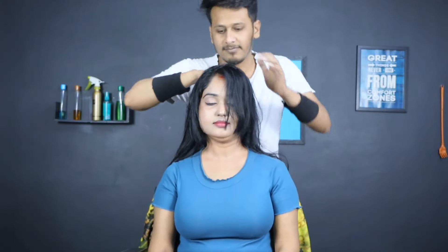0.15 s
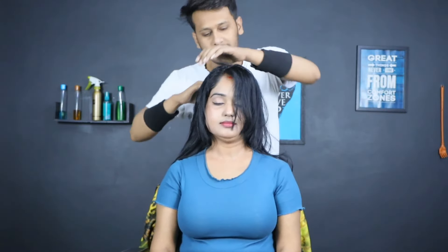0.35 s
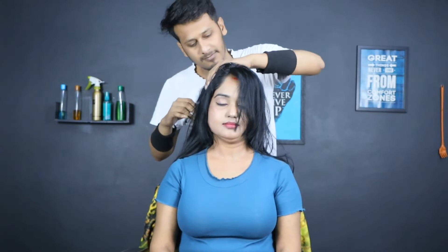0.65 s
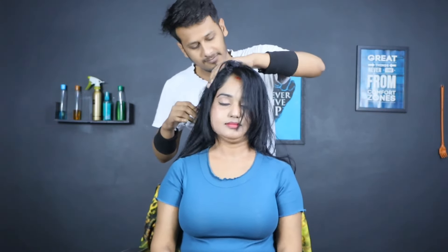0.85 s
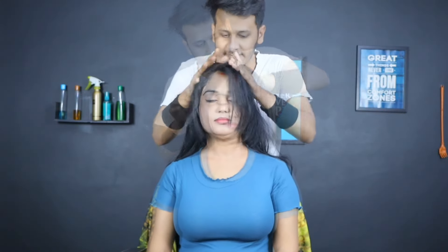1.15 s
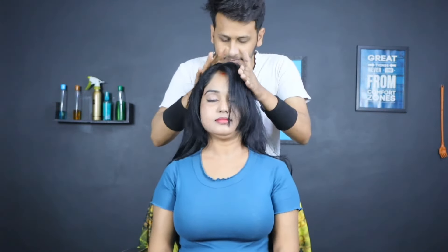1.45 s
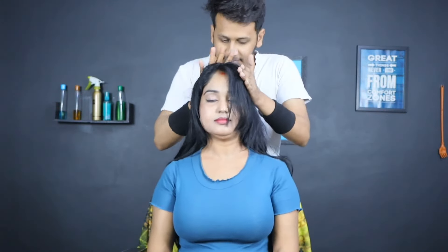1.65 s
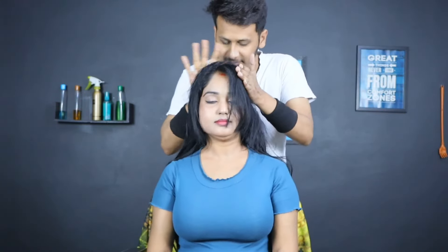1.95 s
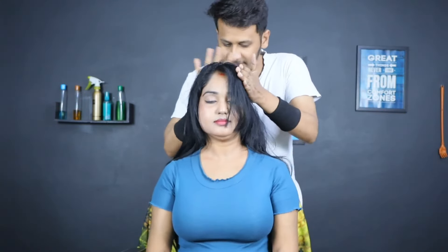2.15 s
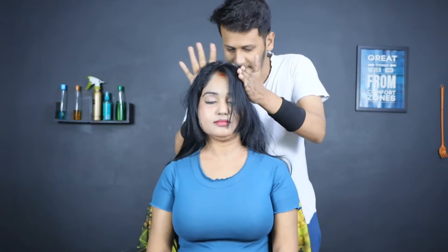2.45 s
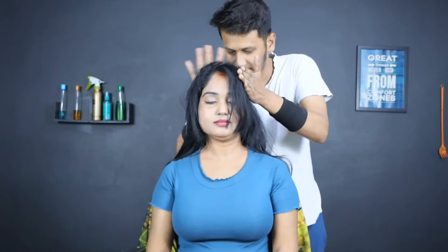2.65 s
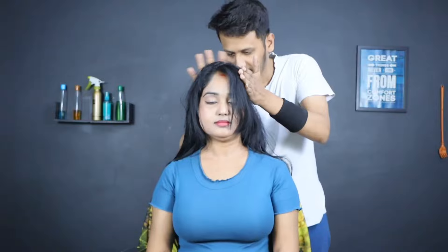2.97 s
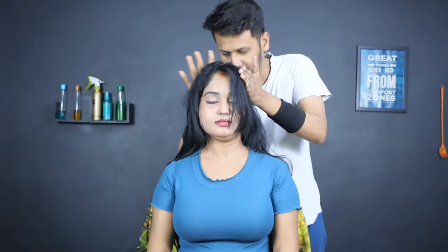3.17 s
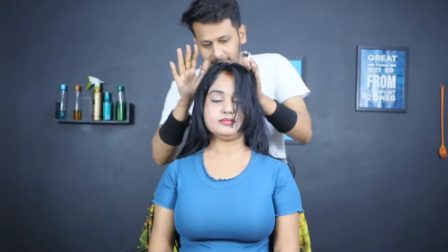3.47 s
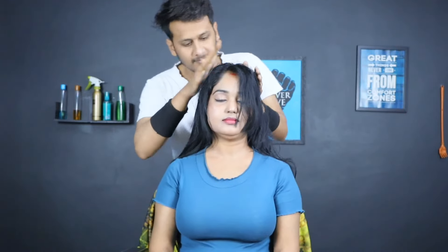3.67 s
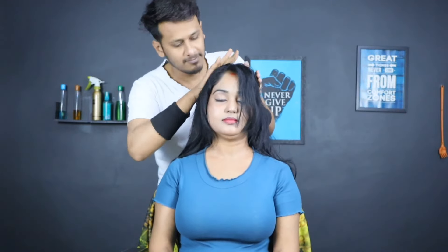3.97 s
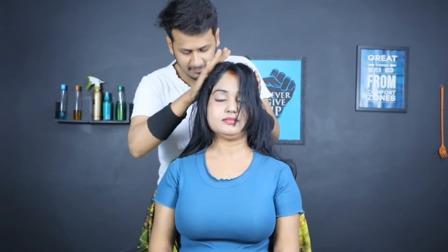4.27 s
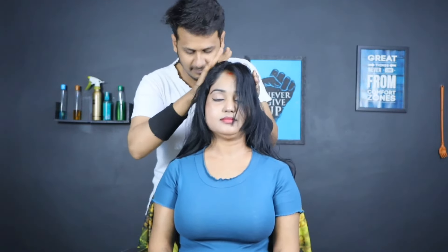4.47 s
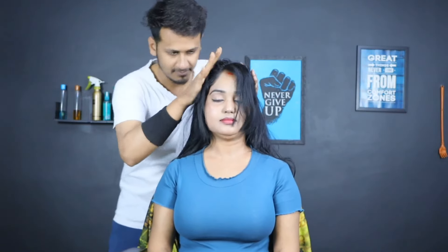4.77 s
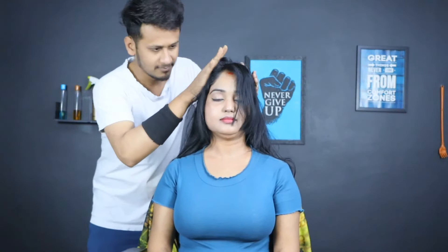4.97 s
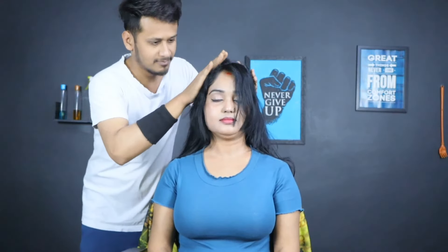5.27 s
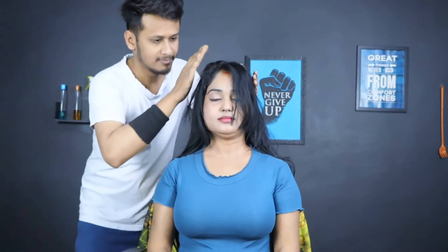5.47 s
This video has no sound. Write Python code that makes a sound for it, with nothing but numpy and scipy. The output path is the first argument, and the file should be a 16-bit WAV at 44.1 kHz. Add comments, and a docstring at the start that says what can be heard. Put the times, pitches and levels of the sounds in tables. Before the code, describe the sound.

Fast, hissing strokes of hands on hair and scalp move between the ears, with two sharp ticks and a few soft microphone bumps.

```python
"""Two hands rub through long hair, each close to one microphone of a binaural pair, in a faintly humming room.
Sliding strands hiss and snap as the hands skim right, then left, then knead; the scalp rumbles softly under
the pressure and sharp ticks sound near 0.8 and 1.5 s. The rubbing settles on the left, about nine strokes a
second, and around 2 s a hand bumps a microphone. After a pause with a dull shuffle at 3.7 s, the strokes
resume a little to the right and gradually lose their sparkle."""
import sys
import numpy as np
from scipy import signal
from scipy.fft import rfft, irfft
from scipy.io import wavfile

SR = 44100
rng = np.random.default_rng(int(sys.argv[2]) if len(sys.argv) > 2 else 0)


def inscribe(sig):
    """Save sig as 16-bit PCM at rate SR to the path in sys.argv[1].

    A 1-D sig is mono; a 2-D sig holds one channel per row.
    Samples are clipped to [-1, 1] before scaling.
    """
    pcm = np.round(np.clip(np.atleast_2d(sig).T, -1, 1) * 32767)
    wavfile.write(sys.argv[1], SR, pcm.astype(np.int16))


N = 247842
TIME = np.arange(N) / SR

# hand strokes, mostly a push and a return in turn: (time of full speed [s], length [s],
# level at the nearer ear [dB], left minus right [dB], extra brightness [dB/octave], move)
HAND_STROKES = [(.05, .073, -45.3, -19, .7, "right skim"), (.131, .041, -45.3, -29, 3.2, "right skim"),
                (.17, .112, -49.7, -11, -1.5, "right skim"), (.688, .058, -40.5, 29, 0, "left skim"),
                (.808, .077, -42.1, 13, -1.3, "left skim"), (.9, .07, -45.1, 16, .6, "left skim"),
                (1.012, .066, -46.5, 18, 3.4, "left skim"), (1.099, .055, -50.6, 12, 3.6, "left skim"),
                (1.134, .099, -47, 1, .5, "knead"), (1.254, .088, -40.4, 1, .3, "knead"),
                (1.339, .056, -34.4, -7, .2, "knead"), (1.38, .095, -39.7, 6, -1.1, "knead"),
                (1.481, .08, -33.7, -1, -.2, "knead"), (1.559, .049, -27.6, -9, -.7, "knead"),
                (1.584, .085, -34, 3, .2, "knead"), (1.679, .072, -39.8, -3, .6, "knead"),
                (1.784, .065, -29.2, 2, .8, "left push"), (1.902, .068, -41.6, 5, 1.4, "left return"),
                (1.997, .051, -27, 10, 0, "left push"), (2.115, .075, -37.5, 12, .6, "left return"),
                (2.227, .06, -32.1, 12, -.8, "left push"), (2.347, .071, -38.8, 11, .8, "left return"),
                (2.45, .047, -28.8, 9, .2, "left push"), (2.567, .089, -42.4, 9, 0, "left return"),
                (2.688, .063, -31.2, 11, .6, "left push"), (2.81, .078, -38.8, 9, -1, "left return"),
                (2.919, .052, -30, 9, .4, "left push"), (3.043, .066, -37, 7, -.3, "left return"),
                (3.15, .058, -30.7, 8, -.2, "left push"), (3.274, .071, -34.1, 7, .4, "left return"),
                (3.383, .064, -28.2, 7, .5, "left push"), (3.425, .044, -31.3, 16, -2.4, "left return"),
                (3.481, .059, -53.1, 18, -5.1, "left skim"), (3.901, .116, -59.8, -2, 0, "right push"),
                (4.013, .047, -39, -11, 1.7, "right return"), (4.093, .069, -33.4, -3, -.9, "right push"),
                (4.225, .067, -34.8, -4, -.4, "right return"), (4.32, .066, -33.1, -5, 0, "right push"),
                (4.447, .062, -35.6, -7, -1.5, "right return"), (4.549, .069, -33.5, -5, -.4, "right push"),
                (4.681, .064, -36.5, -7, -1.1, "right return"), (4.772, .071, -35.1, -4, 0, "right push"),
                (4.907, .064, -36.5, -3, 0, "right return"), (5, .068, -36.5, -2, .5, "right push"),
                (5.094, .073, -49.5, 2, 0, "right push"), (5.144, .052, -43.8, -19, .8, "right return"),
                (5.21, .046, -50.6, -11, -2.5, "right skim"), (5.246, .058, -38.5, 1, .6, "right push"),
                (5.358, .071, -38.6, -2, 0, "right return"), (5.457, .075, -41.8, -2, .5, "right push")]
# the gesture of each move: (share of the length spent speeding up, left ear's lag [s],
# left tilt [dB/octave], right tilt [dB/octave], brightening along the stroke [dB/octave],
# palm's muffling of both spectral ends [dB/octave^2], growth of the palm's ring [dB])
HAND_MOVES = {"right skim": (.48, -.004, 6.4, 4.6, -2.8, -1, 0),
              "left skim": (.37, -.002, 5.9, -4.1, -3.2, -.1, 0),
              "knead": (.39, -.001, 3.2, 1.3, -2, 1.2, 0),
              "left push": (.37, .005, 2.4, -2.3, -2.8, 1.5, 1),
              "left return": (.47, -.007, 2.9, -1.9, 1.4, 1.2, -1.5),
              "right push": (.4, .01, 1.4, -1.9, -1.6, 1.4, 2.5),
              "right return": (.47, -.008, 5.1, .7, 3.8, .9, -3)}


def gain_of(db):
    """Decibels to amplitude."""
    return 10 ** (np.asarray(db) / 20)


def unit_rms(x):
    """Scales to rms 1."""
    return x / np.sqrt(np.mean(x ** 2) + 1e-20)


def curve_at(points, hz):
    """Reads a curve on a log-frequency axis."""
    f, value = np.transpose(points)
    return np.interp(np.log(hz + 1), np.log(f + 1), value)


def coloured(x, eq):
    """Applies an EQ curve of (frequency [Hz], gain [dB])."""
    return irfft(rfft(x) * gain_of(curve_at(eq, np.fft.rfftfreq(N, 1 / SR))), N)


def wide_noise(eq):
    """Coloured stereo noise at rms 1, centred in the bass and wide in the treble."""
    # likeness of the two ears: (frequency [Hz], correlation)
    likeness = [(60, 1), (130, .97), (290, 0.68), (520, 0.47), (700, -0.0039), (1400, -.05), (3000, 0.072),
                (15000, -0.049)]
    left, unrelated = rfft(rng.standard_normal((2, N)))
    same = np.clip(curve_at(likeness, np.fft.rfftfreq(N, 1 / SR)), -1, 1)
    right = same * left + np.sqrt(1 - same ** 2) * unrelated
    return unit_rms(coloured(irfft(np.array([left, right]), N), eq))


def patches(shape, span_s, span_hz, step_s, step_hz):
    """A smooth random field over frequency and time for each ear, rms 1."""
    along_f = np.fft.fftfreq(shape[1], step_hz)[:, None] * span_hz
    along_t = np.fft.rfftfreq(shape[2], step_s) * span_s
    field = np.fft.rfft2(rng.standard_normal(shape)) * np.exp(-2 * (along_f ** 2 + along_t ** 2))
    return unit_rms(np.fft.irfft2(field, shape[1:]))


def room_tone(level_db=-66.2):
    """The room's steady bed of soft, dark noise."""
    # colour of the bed: (frequency [Hz], gain [dB])
    air_eq = [(30, -15), (52, -12), (88, -28), (160, -10), (230, -13.5), (345, -13.5), (400, -17),
              (480, -22), (625, -17.5), (1000, -26.5), (1400, -21.5), (1950, -31), (4000, -29.5),
              (15500, -38.5)]
    return gain_of(level_db) * wide_noise(air_eq)


def room_hum(width_hz=5.3, change_s=2.4):
    """Narrow bands of noise make faint wavering tones whose balance shifts part way through."""
    # tones of the hum: (frequency [Hz], early level [dB], late level [dB])
    tones = [(118, -78, -75.5), (161.3, -69.5, -70.5), (239.1, -79, -65), (287.1, -81.5, -66),
             (342.4, -75, -71), (403, -79, -74)]
    hz, out = np.fft.rfftfreq(N, 1 / SR), np.zeros(N)
    crossfade = .5 + .5 * np.tanh(2 * (TIME - change_s))
    for centre, early_db, late_db in tones:
        tone = irfft(rfft(rng.standard_normal(N)) / (1 + ((hz - centre) / width_hz) ** 2), N)
        out += unit_rms(tone) * gain_of(early_db + crossfade * (late_db - early_db))
    return out


def strands(snaps_per_s=320, snap_db=7, spread_db=2.6):
    """Countless tiny slips merge into hiss; single hairs snap free above it."""
    size = gain_of(snap_db + spread_db * np.minimum(rng.exponential(1, (2, N)), 4))
    snaps = size * rng.choice([-1, 1], (2, N)) * (rng.random((2, N)) < snaps_per_s / SR)
    return unit_rms(rng.standard_normal((2, N)) + snaps)


def stroke_power(hz, t, pivot_hz=4000, rise_steepness=1.8, fall_steepness=1.95):
    """Each stroke swells and fades with the hand's speed and changes colour as the fingers travel."""
    palm_hz, palm_width_hz = 2300, 1100  # the palm's hollow closes on a push and opens on the return
    dull_from_s, dull_rates = 4.4, (5.3, 2)  # the last strokes darken: (left, right) [dB/octave per s]
    octave = np.log2(np.maximum(hz, 600) / pivot_hz)[:, None]
    ends = np.minimum(octave ** 2, 3.05 + 2 * (octave < 0))  # capped: fizz escapes even a firm palm
    palm = np.exp(-(2 * (hz[:, None] - palm_hz) / palm_width_hz) ** 2)
    power = np.zeros((2, len(hz), len(t)))
    for s, length, db, pan_db, bright, move in HAND_STROKES:
        run_up, lag_s, left_tilt, right_tilt, sweep, muffle, ring_db = HAND_MOVES[move]
        near = abs(t - s) < .25
        ears = [(s + lag_s, min(pan_db, 0), left_tilt), (s, min(-pan_db, 0), right_tilt)]
        for ear, (peak_s, far_db, tilt) in enumerate(ears):
            rising = t[near] < peak_s
            ramp_s = np.maximum(length * np.where(rising, run_up, 1 - run_up), .004)
            travel = (t[near] - peak_s) / ramp_s
            speed = np.exp(-abs(travel) ** np.where(rising, rise_steepness, fall_steepness))
            dulling = dull_rates[ear] * max(s - dull_from_s, 0)
            slope = tilt + bright + sweep * np.tanh(travel / 2) - dulling
            colour_db = slope * octave - muffle * ends + ring_db * palm * np.tanh(travel)
            power[ear][:, near] += (speed * gain_of(db + far_db + colour_db)) ** 2
    return power


def cupped_hands(hz, t, crossfade_s=0.11):
    """The hollow between palm and head acts as an EQ, in dB at each ear, that shifts with the hold."""
    # span of each hold: (start [s], end [s])
    holds = {"right skim": (0, .5), "left skim": (.75, 1.15), "knead": (1.15, 1.9), "left rub": (1.9, 3.6),
             "right rub": (3.6, 5.7)}
    # resonances and dips of each hold: (frequency [Hz], width [Hz], left gain [dB], right gain [dB])
    resonances = {"right skim": [(2100, 500, 0, 4), (3500, 1000, -2, -4)],
                  "left skim": [(1650, 900, 8, .5)], "knead": [(750, 400, -9, -1), (1204, 330, 8, 8.5),
                  (2000, 500, 3, 0), (2690, 400, 4, 4), (3610, 400, -2, 5)],
                  "left rub": [(1050, 400, 2.5, 0), (1550, 650, -2, -3), (2250, 500, 3.5, 6.5),
                  (2820, 400, -2.5, 5), (3250, 450, 3, 0), (5400, 1200, 1, 2), (7900, 1600, -.5, -5)],
                  "right rub": [(1300, 600, 1, 1.5), (2120, 700, 3.5, 0), (4600, 2000, -1, -1),
                  (7000, 2000, 2, -.3)]}
    db = np.zeros((2, len(hz), len(t)))
    for hold, (start, end) in holds.items():
        held = (np.tanh((t - start) / crossfade_s) - np.tanh((t - end) / crossfade_s)) / 2
        for centre, width, left_db, right_db in resonances[hold]:
            bell = np.exp(-(2 * (hz - centre) / width) ** 2)
            db += np.multiply.outer([left_db, right_db], np.outer(bell, held))
    return db


def rubbing(hair_db=3.5, hollow_db=2.6, catch_db=1.52):
    """The hiss of the strands, driven by the strokes and coloured by the hands."""
    # colour of sliding hair at each ear: (frequency [Hz], gain [dB])
    left_eq = [(150, -29.5), (450, -12.5), (735, -14.5), (1060, -4), (1460, 1), (2500, 3), (4400, 3.5),
               (5700, 3), (7400, 0.4), (9700, -1.5), (12600, -6), (15500, -13)]
    right_eq = [(150, -26), (450, -14.5), (735, -9.5), (1060, -4.5), (1460, 1), (2300, 5.5), (3300, 3.5),
                (5700, 3), (7400, .5), (9700, -0.4), (12600, -4), (15500, -12.5)]
    # what passes round the head to the far ear: (frequency [Hz], gain [dB])
    head_shadow = [(300, -6), (700, -12.5), (1400, -18.5), (3000, -30), (7000, -49), (14000, -41)]
    hz, t, spectrum = signal.stft(strands(), SR, nperseg=512, noverlap=384)
    hair = np.array([curve_at(left_eq, hz), curve_at(right_eq, hz)])[:, :, None]
    # gaps between the fingers make narrow passing resonances; locks of hair catch and let go
    hollows = hollow_db * patches(spectrum.shape, span_s=0.061, span_hz=244, step_s=t[1], step_hz=hz[1])
    catches = catch_db * patches(spectrum.shape, span_s=0.025, span_hz=5950, step_s=t[1], step_hz=hz[1])
    colour = gain_of(hair_db + hair + cupped_hands(hz, t) + hollows + catches)
    stroked = spectrum * np.sqrt(stroke_power(hz, t)) * colour
    hiss = signal.istft(stroked, SR, nperseg=512, noverlap=384)[1][:, :N]
    near_ear = stick_slip() * turnarounds() * hiss
    return near_ear + coloured(near_ear[::-1], head_shadow)


def room_reverb(x, wet_db=-18.5, build_s=0.0067):
    """A short diffuse tail, different at each ear, whose treble dies first."""
    # decay of the room: (frequency [Hz], time to fall 60 dB [s])
    t60 = [(200, 0.5), (1500, .36), (5000, 0.31), (15000, 0.19)]
    # colour of the reverb: (frequency [Hz], gain [dB])
    reverb_eq = [(200, 18.5), (4000, -3.5), (15000, -8)]
    hz, t, noise = signal.stft(rng.standard_normal((2, SR // 2)), SR, nperseg=256)
    envelope = gain_of(-60 * t / curve_at(t60, hz)[:, None]) * (1 - np.exp(-t / build_s))
    tail = signal.istft(noise * envelope, SR, nperseg=256)[1]
    send = x.sum(0)[None] / np.sqrt(2)
    wet = signal.fftconvolve(send, tail / np.linalg.norm(tail[0]), axes=1)[:, :N]
    return gain_of(wet_db) * coloured(wet, reverb_eq)


def turnarounds(dip_db=-2.2, half_s=.007, apart=1.3):
    """The hiss dips where the hand stops to turn round between two separate strokes."""
    db = np.zeros(N)
    for stroke, following in zip(HAND_STROKES, HAND_STROKES[1:]):
        s, length, *_, move = stroke
        next_s, next_length, *_, next_move = following
        fall, rise = length * (1 - HAND_MOVES[move][0]), next_length * HAND_MOVES[next_move][0]
        if next_s - s > apart * (fall + rise):
            turn_s = s + (next_s - s) * fall / (fall + rise)
            db += dip_db * np.exp(-((TIME - turn_s) / half_s) ** 2)
    return gain_of(db)


def stick_slip(relax_s=0.0084, snap_s=.001):
    """Friction holds the hair quiet just before a slip and lets it rush just after."""
    # the fingers stick, then break free: (time [s], jump [dB])
    slips = [(.669, 6), (1.078, 10), (1.985, 4), (2.216, 3), (2.441, 4), (2.67, 2), (2.91, 3), (3.139, 9),
             (3.366, 3), (4.071, 6), (4.984, 6), (5.136, 9), (5.322, 9)]
    db = np.zeros(N)
    for s, jump in slips:
        db += jump / 2 * np.tanh((TIME - s) / snap_s) * np.exp(-abs(TIME - s) / relax_s)
    return gain_of(db)


def scalp_rumble(trim_db=-1.5):
    """Low rumble of skin that swells with each press."""
    # a hand leans on the scalp or drags over a microphone: (time [s], half length [s], level [dB])
    presses = [(.77, .02, -61), (1.5, .2, -67), (1.94, .035, -51), (2.01, .045, -40.5), (2.135, .012, -34),
               (2.225, .04, -38), (2.33, .12, -60), (2.47, .02, -58), (3.05, .35, -66), (3.7, .06, -58),
               (4.11, .09, -61), (4.455, .028, -51.5), (4.67, .03, -53), (4.88, .06, -64),
               (5.35, .3, -66.5)]
    # colour of the rumble: (frequency [Hz], gain [dB])
    scalp_eq = [(20, -42), (38, -12), (50, -5), (65, -1), (82, -1.5), (115, 2), (180, -3), (290, -6.5),
                (400, -18.5), (600, -35), (1200, -35), (4000, -76)]
    pressure = sum(gain_of(db) * np.exp(-((TIME - s) / half) ** 2) for s, half, db in presses)
    return gain_of(trim_db) * pressure * wide_noise(scalp_eq)


def ticks(cycles=0.65):
    """Dry ticks, hardly more than one cycle long."""
    # two sharp ticks, each led by a faint one: (time [s], peak [dB], pitch [Hz], left minus right [dB])
    hits = [(.779, -43, 1500, -8), (.796, -26.5, 1600, -12.5), (1.498, -42.5, 800, -4),
            (1.515, -23, 1310, -6.5)]
    out, t = np.zeros((2, N)), np.arange(-200, 200) / SR
    for s, db, hz, pan_db in hits:
        tick = np.sin(2 * np.pi * hz * t) * np.exp(-(t * hz / cycles) ** 2)
        add(out, s + t[0], gain_of([[db + pan_db / 2], [db - pan_db / 2]]) * tick / abs(tick).max())
    return out


def microphone_bumps(attack_s=0.003):
    """Soft knocks ring a few damped low modes of the head."""
    # a hand knocks against the microphone: (time [s], peak [dB])
    knocks = [(1.974, -36), (1.992, -40), (2.025, -29), (2.116, -35), (2.134, -21), (2.186, -45),
              (2.198, -37), (2.234, -30.5), (2.251, -35.5)]
    # modes of the head: (frequency [Hz], relative level [dB], t60 [s], left minus right [dB])
    modes = [(68, -8, .09, 4), (120, 0.5, 0.08, 5.5), (182, 7.5, 0.044, -3), (243, 4, 0.033, -11),
             (326, -13, 0.018, 3)]
    out, t = np.zeros((2, N)), np.arange(SR // 6) / SR
    thud = np.zeros((2, len(t)))
    for hz, db, t60, pan_db in modes:
        pan = gain_of([[pan_db / 2], [-pan_db / 2]])
        thud += pan * gain_of(db - 60 * t / t60) * np.sin(2 * np.pi * hz * t)
    thud *= 1 - np.exp(-(t / attack_s) ** 2)
    for s, db in knocks:
        add(out, s, gain_of(db) * thud / abs(thud).max())
    return out


def hand_shuffle():
    """A dull shuffle while the hands shift their hold."""
    # swells of the shuffle: (time [s], level [dB])
    fader = [(3.5, -100), (3.63, -68), (3.68, -64), (3.72, -62), (3.74, -58), (3.77, -68), (3.84, -75),
             (5.3, -70), (5.45, -59.5), (5.55, -63.5), (5.62, -64)]
    # colour of the shuffle: (frequency [Hz], gain [dB])
    shuffle_eq = [(40, -26), (150, -10), (400, 0), (750, 0.5), (1400, -10.5), (3000, -22), (7000, -25.5),
                  (15000, -43)]
    return gain_of(np.interp(TIME, *np.transpose(fader))) * wide_noise(shuffle_eq)


def add(mix, s, sound):
    """Mixes a stereo sound in at time s."""
    part = mix[:, max(round(s * SR), 0):][:, :sound.shape[1]]
    part += sound[:, :part.shape[1]]


def scene():
    """Hands in hair close by, with the room behind them."""
    hands = rubbing() + ticks()
    reverb = room_reverb(hands)
    handling = scalp_rumble() + microphone_bumps() + hand_shuffle()
    return hands + reverb + handling + room_hum() + room_tone()


def record(dry, low_cut_hz=50, high_cut_hz=15650):
    """The recorder's low cut and band limit."""
    lean = signal.sosfilt(signal.butter(3, low_cut_hz, "high", fs=SR, output="sos"), dry)
    high_cut = signal.firwin(601, high_cut_hz, window=("kaiser", 9), fs=SR)
    return signal.oaconvolve(lean, high_cut[None], "same")


dry = scene()
out = record(dry)
inscribe(out)
```